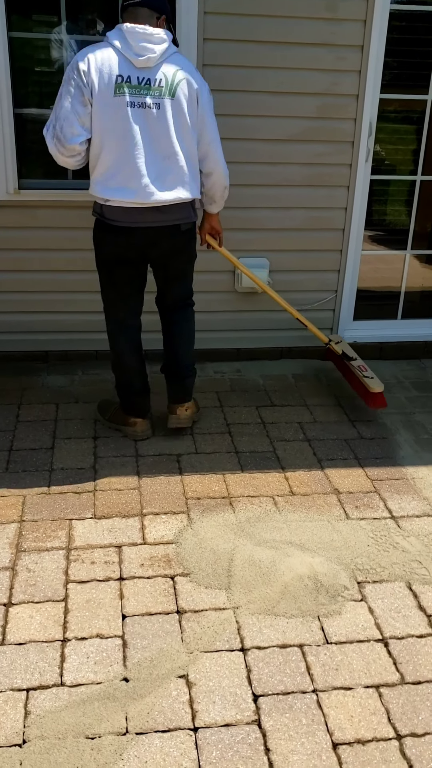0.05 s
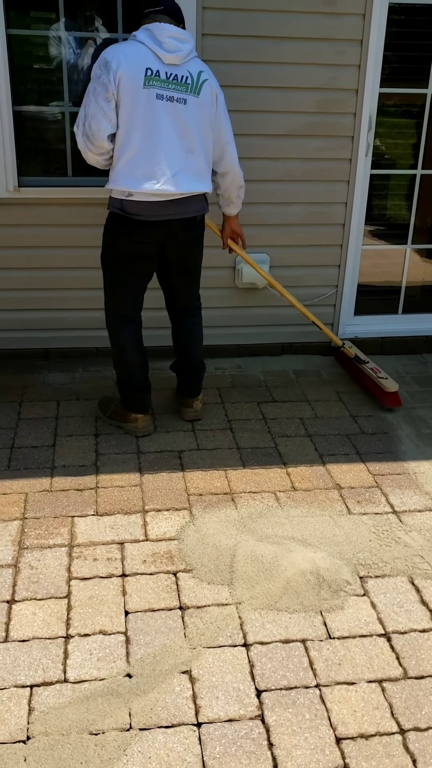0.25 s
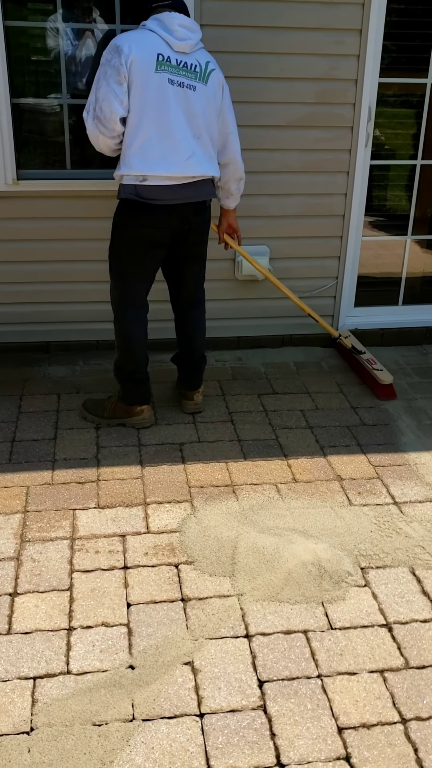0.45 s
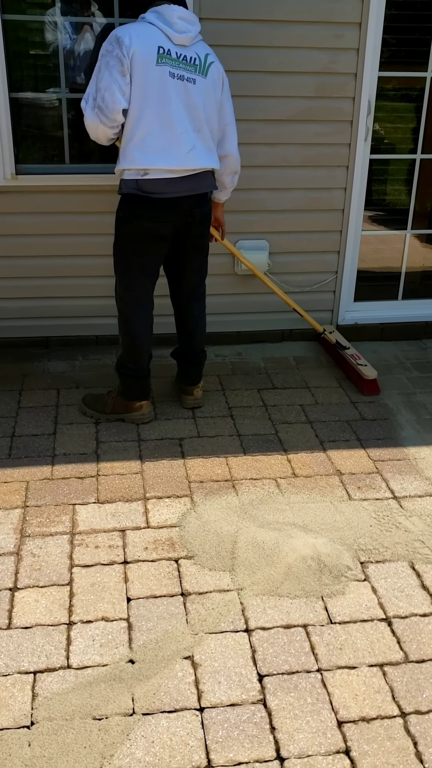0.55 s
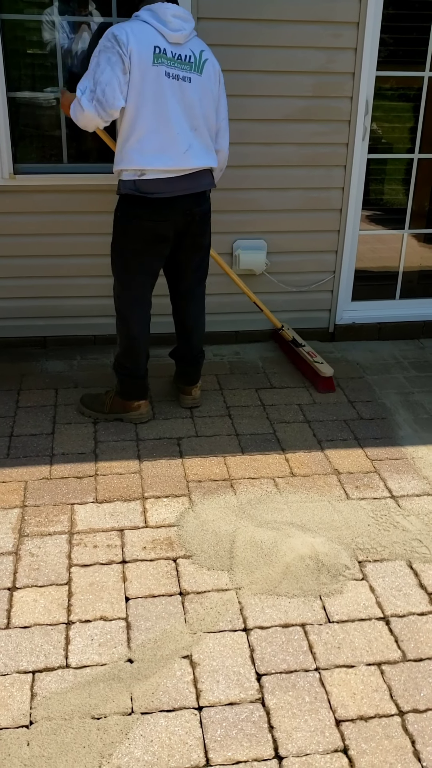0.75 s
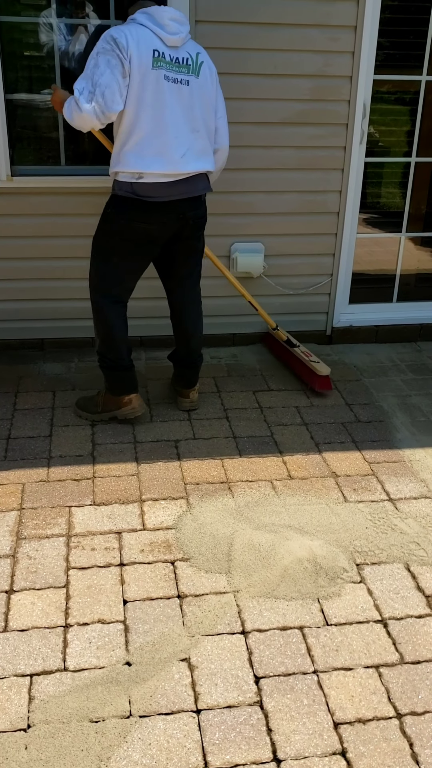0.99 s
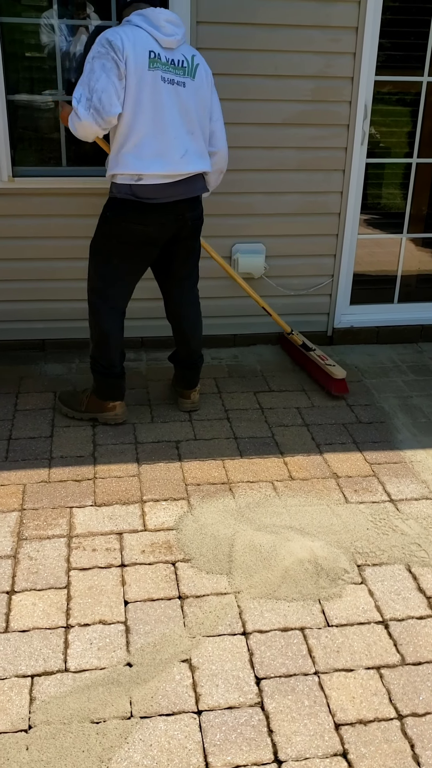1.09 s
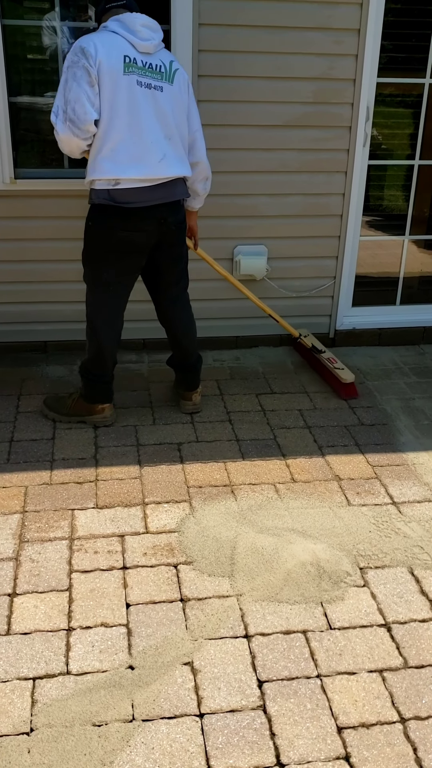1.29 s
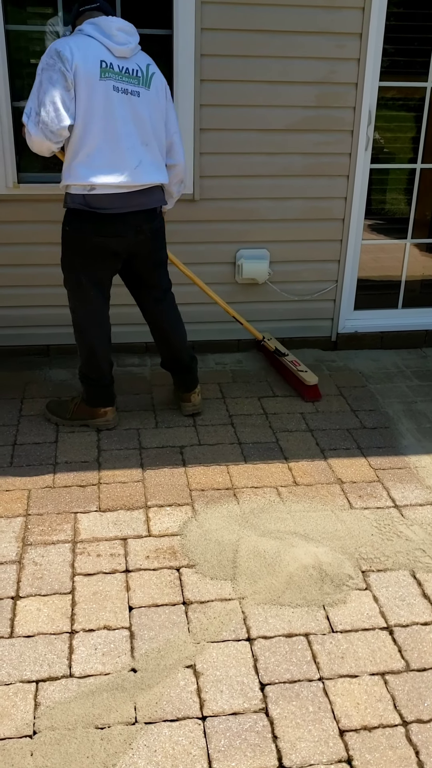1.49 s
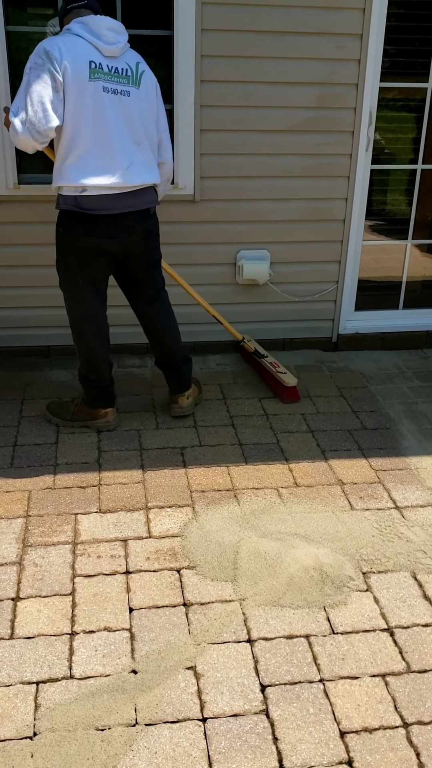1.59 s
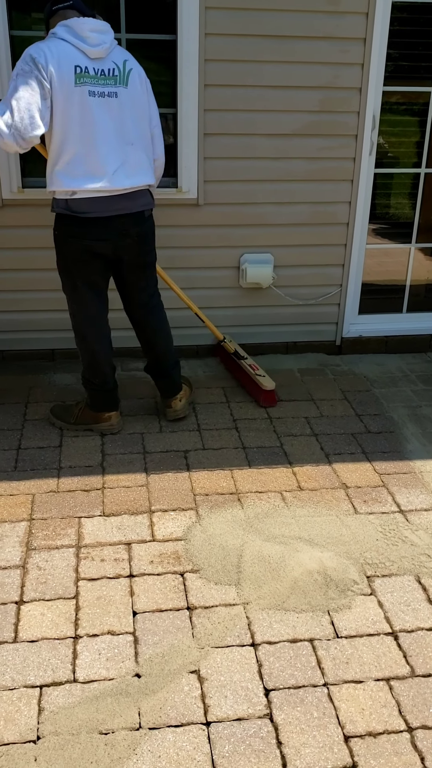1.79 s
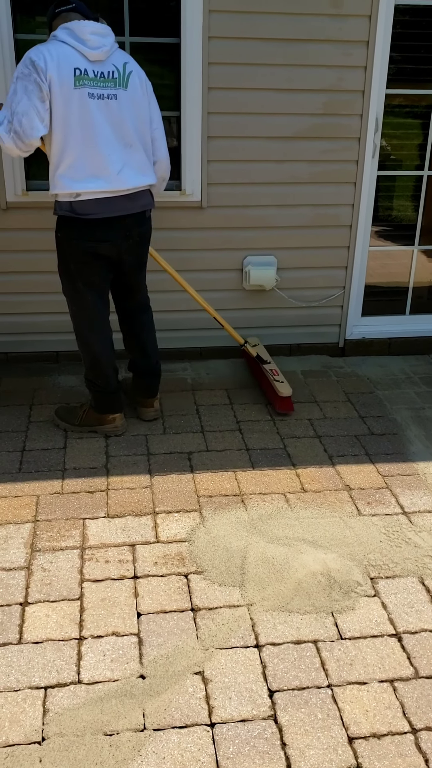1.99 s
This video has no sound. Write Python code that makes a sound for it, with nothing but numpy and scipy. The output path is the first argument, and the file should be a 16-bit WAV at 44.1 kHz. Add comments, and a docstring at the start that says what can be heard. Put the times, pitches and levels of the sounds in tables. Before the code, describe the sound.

Broom sweeping on a sandy patio beside a house wall, heard close in stereo. Shoes crunch, the broom head knocks once and swishes, pauses with a step, then swishes again over faint birds, rumble and hum.

```python
"""A paver patio beside a house, where a stiff push broom makes two strokes through sand.
Grain clicks over noise make the bristle rasp, sand hiss and shoe scuffs; two heel stamps are short sine thumps.
The wooden broom head knocks once, a sum of decaying modes, and the wall throws it back.
A small bird trills far off in falling sine notes, a second whistles, and shaped noise makes the
outdoor rumble, air and fading roar, with a faint machine hum of wavering sines."""
import sys
import numpy as np
from scipy import signal
from scipy.fft import rfft, irfft
from scipy.io import wavfile

SR = 44100
rng = np.random.default_rng(int(sys.argv[2]) if len(sys.argv) > 2 else 0)


def materialize(psi):
    """Save the field psi as 16-bit PCM at rate SR to the path in sys.argv[1].

    A 1-D psi becomes a single channel; in a 2-D psi each row is a channel.
    """
    bounded = np.clip(np.atleast_2d(psi).T, -1, 1)
    quanta = np.round(bounded * 32767).astype(np.int16)
    wavfile.write(sys.argv[1], SR, quanta)


N = 90404
T, HZ = np.arange(N) / SR, np.fft.rfftfreq(N, 1 / SR)

# Noise colours. Each row: frequency in Hz, relative level per Hz in dB.
RUMBLE_COLOUR = [(26, -32), (40, -9), (60, -0.5), (80, 3.5), (110, -9), (170, -16.5), (400, -54),
                 (2000, -90)]
# Colour of the open air. Each row: frequency in Hz, relative level per Hz in dB.
AIR_COLOUR = [(25, -21), (60, 0), (150, 0), (250, -4), (380, -3.5), (550, -9), (900, -7.5), (1400, -12),
              (2200, -18), (3000, -23), (3600, -32.5), (7000, -24.5), (8200, -31.5), (10000, -87),
              (12000, -43), (15000, -44)]
# Colour of the far-off roar. Each row: frequency in Hz, relative level per Hz in dB.
ROAR_COLOUR = [(400, 0), (650, 2.5), (850, 13), (1050, 2.5), (1400, -7), (3000, -68)]
RUMBLE_DB, AIR_DB, ROAR_DB = -52, -57.5, -57.5  # the roar's level is at the start
ROAR_FADE_DB_PER_S = 7
# Partials of the machine hum. Each row: frequency in Hz, rms level in dB.
HUM_PARTIALS = [(59.5, -59.5), (161.5, -67.5), (323.5, -63)]

# The broom's travel. Each row: time in seconds, bristle rasp level in dB, sand hiss level in dB.
BROOM_TRAVEL = [(0, -57, -75), (.12, -67.5, -81), (.38, -71, -82), (.42, -75, -57), (0.476, -50.5, -65),
                (.50, -65.5, -73), (0.559, -51.5, -65), (0.661, -47.5, -50.5), (0.779, -44.5, -49),
                (.855, -44, -49), (.91, -50, -56.5), (0.958, -54, -66.5), (1.02, -67, -76),
                (1.2, -69, -104), (1.26, -56, -81), (1.31, -57, -61.5), (1.39, -57.5, -67.5),
                (1.44, -50, -57.5), (1.502, -42, -55), (1.57, -43.5, -50), (1.70, -46.5, -48),
                (1.77, -45, -51.5), (1.84, -53, -63), (1.89, -58, -69), (1.94, -70.5, -75.5),
                (2.04, -74, -84)]
# Colour of bristles on pavers. Each row: frequency in Hz, relative level per Hz in dB.
RASP_COLOUR = [(100, -43), (350, -19.5), (600, -17.5), (850, -12.5), (1150, -10.5), (1500, -2),
               (2050, -5.5), (2350, 1), (2900, -5), (3200, -5.5), (3700, -13.5), (5000, -16), (7400, -15.5),
               (8500, -34)]
# Colour of driven sand. Each row: frequency in Hz, relative level per Hz in dB.
HISS_COLOUR = [(1500, -7.5), (3500, 0.5), (4600, 1.5), (7400, 1), (8500, -0.5), (10200, -3.5), (11300, 3.5),
               (12400, 4.5), (13600, 0.5), (15000, -8)]
# Colour of the light drag. Each row: frequency in Hz, relative level per Hz in dB.
DRAG_COLOUR = [(200, -12), (900, -3), (1600, 2.5), (2600, 2.5), (3200, -1.5), (3550, 3), (4200, -6),
               (5500, -5), (6400, -8), (7400, 1.5), (8300, -39)]
DRAG_DB = -55  # before it is leaned to the right
DRAG_FROM_S, DRAG_TO_S, DRAG_FADE_S = 0.96, 1.388, 0.08
TICK_S, TICK_DB = 1.0495, -56  # one grain snaps off a bristle
# Bristles and block ringing under the stroke. Each row: frequency in Hz, width in Hz, boost in dB.
BLOCK_RESONANCES = [(1696, 40, 2.5), (1820, 34, 3), (2010, 57, 1.5), (2273, 24, 4), (2400, 23, 3.5),
                    (2717, 97, 4.5), (2920, 57, 6), (3300, 43, -2)]
# Broom echoes off paving and wall. Each row: delay in seconds, level in dB.
BROOM_ECHOES = [(.0043, -18.5), (0.011, -13.5), (0.0174, -15)]

# The broom at the two microphone ports. Each row: frequency in Hz, likeness of the ports from 0 to 1,
# left lead in radians, left over right in dB.
BROOM_PORTS = [(198, 0.3, 3.7, -10), (620, 0.8, 2.2, 4), (840, 0.5, 0, 13), (1230, 0.74, 0.07, -2),
               (1900, 0.92, 1.1, 4), (2430, 0.4, 0, 11), (3280, 0.55, 1.56, 6), (4350, 0.2, -7, 10),
               (6400, 0, 1.5, 7), (7740, 0, -13, 5), (8500, 0.6, -5, -5.5), (11000, 0.2, -4, 8),
               (12400, 0.3, -3.5, 5.5), (15200, 0.5, -7, 12)]
# Shoes, drag and outdoors at the ports. Each row: frequency in Hz, likeness from 0 to 1,
# left lead in radians, left over right in dB.
NEAR_PORTS = [(101, 0.97, 0, 0.5), (394, 0.88, 0.16, -1), (1200, 0.49, 0.003, 2.5),
              (2460, 0.41, 0.086, 4.5), (5050, 0.12, 0, 13.5), (14300, 0.2, 0.05, 4.5)]

# One falling chip of the trill. Each row: time in seconds, pitch in Hz.
CHIP_GLIDE = [(0, 7360), (.005, 6700), (.011, 5640), (.016, 4800), (.026, 4080)]
# The short note after each chip. Each row: time in seconds, pitch in Hz.
FLICK_GLIDE = [(0, 7100), (.004, 6850), (.008, 6360), (.015, 5400)]
TRILL_S, CHIP_GAP_S, CHIP_COUNT = .1375, .05412, 33
TRILL_DB, TRILL_SWELL_S = -55.5, 0.49  # level before panning
TRILL_LAG_S = .013  # the last chips come a little late as the trill runs out
FLICK_S, FLICK_DB = .0195, -2  # delay after the chip, level against it
# A second bird. Each row: start in seconds, length in seconds, pitch in Hz, peak level before panning in dB.
WHISTLES = [(-.01, 0.054, 5700, -59), (0.07, 0.047, 5980, -59.5), (0.241, 0.039, 5650, -59.5),
            (0.989, 0.063, 5980, -51), (0.994, 0.055, 6740, -54)]

# Shoes on sand. Each row: start in seconds, length before the fall in seconds, sole scrape in dB
# before its ring is added, coarse grit in dB, sand fizz in dB, heel thud in dB, ring of the sole in Hz.
SCUFFS = [(.171, 0.029, -48.5, -52, -72, -50, 1950), (0.207, .023, -46.5, -51.5, -63, -41, 2000),
          (0.234, 0.012, -47.5, -56.5, -61, -45.5, 1930), (.366, 0.017, -46.5, -64, -66, -64, 1630),
          (.402, 0.0092, -41, -55.5, -54.5, -48.5, 1774), (1.223, 0.0075, -43.5, -49.5, -74, -48.5, 1440),
          (1.238, 0.038, -52.5, -66.5, -70, -53.5, 1290)]
SCUFF_RISE_S, SCUFF_FALL_S = 0.0026, 0.0072
SOLE_Q, SOLE_RING = 7.8, 1.4  # sharpness, gain of the ring
# Colour of the scraping sole. Each row: frequency in Hz, relative level per Hz in dB.
SCRAPE_COLOUR = [(80, -16), (300, -14), (600, -3.5), (850, 3.5), (1800, 3.5), (2900, 7), (3200, -16),
                 (4200, -20), (9000, -40)]
# Colour of coarse grit. Each row: frequency in Hz, relative level per Hz in dB.
GRIT_COLOUR = [(1500, -24), (3000, 6.5), (3700, -1), (4400, -5), (7500, -12), (9000, -25.5)]
# Colour of fine sand underfoot. Each row: frequency in Hz, relative level per Hz in dB.
FIZZ_COLOUR = [(3000, -15), (7500, 1.5), (8800, -27), (11500, 0.5), (15000, -8)]
# Colour of the soft heel thud. Each row: frequency in Hz, relative level per Hz in dB.
THUD_COLOUR = [(40, -10), (130, -11), (230, 0.5), (380, -3), (700, -16), (3000, -70)]
# A coarse grain breaks under the sole. Each row: time in seconds, approximate peak level in dB.
CRACKS = [(0.2378, -29.5), (0.4062, -35), (1.2225, -35), (1.2278, -39)]
CRACK_HZ, CRACK_DECAY_S = 1700, 0.00025
# A heel takes the full weight. Each row: time in seconds, pitch in Hz, peak level in dB.
STAMPS = [(.217, 217, -33.5), (1.2338, 86, -37.5)]
STAMP_PEAK_S = .004

# Modes of the wooden head. Each row: frequency in Hz, relative level in dB, 60 dB decay in seconds,
# left over right in dB.
HEAD_MODES = [(387, 12, 0.014, 0), (448, -8, 0.029, -12), (380, -19.5, .1, -7.5), (862, -9.5, .024, 10),
              (1033, -0.5, 0.0091, 11), (1296, -5, 0.016, 0), (1464, -15.5, 0.026, 4),
              (1840, -18.5, 0.03, 5.5), (2380, -9.5, 0.0082, 8), (2820, -17, 0.012, 9.5)]
KNOCK_S, KNOCK_DB, KNOCK_RISE_CYCLES = .5128, -12.5, 1.9
BLOCK_NODE_HZ = 650  # modes of the head above this start in the opposite direction
HEAD_PORT_LAG_S = 0.00019  # the knock reaches the right port a little later
# The house wall's answers. Each row: delay in seconds, level in dB.
WALL_ECHOES = [(.0104, -25), (0.0159, -13.5), (.0258, -13)]

# Treble notch of the left port, then the right. Each row: centre in Hz, width in Hz.
PORT_NOTCHES = [(8440, 410), (7870, 1420)]
EDGE_HZ = 14750  # top of the band


def amp(db):
    """Decibels to gain."""
    return 10 ** (np.asarray(db) / 20)


def unit(x):
    """Scales to rms 1."""
    return x / np.sqrt(np.mean(x ** 2) + 1e-20)


def read(table, axis=1):
    """One column of a frequency table at every bin, along a log frequency scale."""
    table = np.array(table)
    return np.interp(np.log(HZ + 1), np.log(table[:, 0]), table[:, axis])


def add(mix, s, sound):
    """Mixes a sound in at a time, trimmed to the scene."""
    at = round(s * SR)
    sound = sound[..., max(-at, 0):]
    part = mix[..., max(at, 0):][..., :sound.shape[-1]]
    part += sound[..., :part.shape[-1]]


def drift(rate_hz):
    """Random wander of rms 1, mostly slower than the rate."""
    return unit(irfft(rfft(rng.standard_normal(N)) / (1 + (HZ / rate_hz) ** 4), N))


def noise():
    """Two unrelated white noises."""
    return rng.standard_normal((2, N))


def grains(per_s, spread_db, wash):
    """Two unrelated trains of tiny clicks of uneven size over a smooth wash."""
    size = amp(spread_db * np.minimum(rng.exponential(1, (2, N)), 4))
    size = size * rng.choice([-1, 1], (2, N))
    struck = rng.random((2, N)) < per_s / SR
    return unit(size * struck) + wash * noise()


def heard(drive, colour, ports):
    """Colours a pair of drives and places them at the two ports; the middle has rms 1."""
    a, b = rfft(drive)
    same = np.clip(read(ports), 0, 1)
    side = amp(read(ports, axis=3) / 2)
    right = same * a + np.sqrt(1 - same ** 2) * b
    right = right * np.exp(-1j * read(ports, axis=2))
    x = irfft(np.array([a * side, right / side]) * amp(read(colour)), N)
    return x / x.mean(0).std()


def patio(x, t60):
    """A short diffuse tail from walls and paving: decaying noise with a soft onset."""
    t = T[:SR // 2]
    tail = rng.standard_normal((2, len(t))) * amp(-60 * t / t60) * np.minimum(t / 0.0092, 1)
    tail /= np.linalg.norm(tail[0])
    return signal.fftconvolve(np.atleast_2d(x), tail, axes=1)[:, :N]


def outdoors():
    """Uneven rumble, air and a fading far-off roar, with the wavering hum of a machine."""
    rumble = heard(noise(), RUMBLE_COLOUR, NEAR_PORTS) * amp(RUMBLE_DB + 2 * drift(rate_hz=10.4))
    air = heard(noise(), AIR_COLOUR, NEAR_PORTS) * amp(AIR_DB + 0.81 * drift(rate_hz=13))
    roar = heard(noise(), ROAR_COLOUR, NEAR_PORTS) * amp(ROAR_DB - ROAR_FADE_DB_PER_S * T)
    hum = np.zeros(N)
    for hz, db in HUM_PARTIALS:
        cycles = np.cumsum(hz * (1 + 0.0084 * drift(rate_hz=12.8))) / SR + rng.random()
        hum += amp(db) * np.sqrt(2) * np.sin(2 * np.pi * cycles)
    return rumble + air + roar + hum


def rung(x):
    """The broom block rings along and nearby surfaces return the sound; overall level is kept."""
    boost = amp(sum(db / (1 + (2 * (HZ - hz) / width) ** 2) for hz, width, db in BLOCK_RESONANCES))
    echoes = 1 + sum(amp(db) * np.exp(-2j * np.pi * HZ * delay) for delay, db in BROOM_ECHOES)
    y = irfft(rfft(x) * boost * echoes, N)
    return y * x.std() / y.std()


def broom():
    """Bristles flick over the pavers and drive sand ahead; between strokes they are drawn lightly back."""
    s, rasp_db, hiss_db = np.transpose(BROOM_TRAVEL)
    catch = drift(rate_hz=36)  # shared unevenness of the bristles, in dB
    rasp = heard(grains(per_s=2000, spread_db=2.5, wash=0.6), RASP_COLOUR, BROOM_PORTS)
    rasp *= amp(np.interp(T, s, rasp_db) + catch)
    hiss = heard(grains(per_s=4500, spread_db=-0.5, wash=0.66), HISS_COLOUR, BROOM_PORTS)
    hiss *= amp(np.interp(T, s, hiss_db) + 0.83 * catch)

    contact = np.clip(np.minimum(T - DRAG_FROM_S, DRAG_TO_S - T) / DRAG_FADE_S, 0, 1)
    drag = heard(grains(per_s=1800, spread_db=-1.5, wash=0.61), DRAG_COLOUR, NEAR_PORTS)
    drag *= contact * amp(DRAG_DB + 1.85 * catch)
    lean_right = amp([[-3.5], [3.5]])

    tick = heard(noise(), HISS_COLOUR, NEAR_PORTS)
    tick *= np.exp(-abs(T - TICK_S) / .0004) * amp(TICK_DB)
    return rung(rasp) + rung(hiss) + tick + rung(drag) * lean_right


def note(glide):
    """A whistled note that swells quickly and fades as it falls."""
    s, hz = np.transpose(glide)
    t = np.arange(0, s[-1], 1 / SR)
    swell = np.sin(np.pi * (t / s[-1]) ** 0.62) ** 2
    return np.sin(2 * np.pi * np.cumsum(np.interp(t, s, hz)) / SR) * swell


def birds():
    """A distant trill of falling chips that swells in, and a few thin whistles of unsteady pitch."""
    chip, flick = note(CHIP_GLIDE), note(FLICK_GLIDE)
    trill, calls = np.zeros(N), np.zeros(N)
    for k, size_db in enumerate(rng.normal(0, 0.17, CHIP_COUNT)):
        swell = min((k + 1) * CHIP_GAP_S / TRILL_SWELL_S, 1)
        s = TRILL_S + k * CHIP_GAP_S + TRILL_LAG_S * (k / CHIP_COUNT) ** 7
        add(trill, s, chip * swell * amp(TRILL_DB + size_db))
        add(trill, s + FLICK_S, flick * swell * amp(TRILL_DB + size_db + FLICK_DB))
    for start, length, pitch_hz, db in WHISTLES:
        arch = np.sin(np.pi * np.clip((T - start) / length, 0, 1))
        cycles = np.cumsum(pitch_hz * (1 + 0.0126 * drift(rate_hz=380))) / SR
        calls += amp(db) * arch * np.sin(2 * np.pi * cycles)
    direct = (trill + calls) * amp([[3], [-7]])  # left, right
    return direct + amp([[-1], [-8]]) * patio(trill, t60=0.16)


def shoes():
    """Each sole scrapes with its own ring, crunches the sand and thuds softly as it takes weight."""
    scrape = heard(grains(per_s=3200, spread_db=0.0, wash=0.54), SCRAPE_COLOUR, NEAR_PORTS)
    grit = heard(grains(per_s=1500, spread_db=1.0, wash=0.43), GRIT_COLOUR, NEAR_PORTS)
    fizz = heard(grains(per_s=2500, spread_db=1.0, wash=0.3), FIZZ_COLOUR, NEAR_PORTS)
    thud = heard(noise(), THUD_COLOUR, NEAR_PORTS)
    x, t = np.zeros((2, N)), T[:SR // 10]
    for s, length, scrape_db, grit_db, fizz_db, thud_db, sole_hz in SCUFFS:
        rise = np.clip((T - s) / SCUFF_RISE_S, 0, 1)
        press = rise * np.exp(-np.maximum(T - s - length, 0) / SCUFF_FALL_S)
        sole = scrape + SOLE_RING * signal.lfilter(*signal.iirpeak(sole_hz, SOLE_Q, fs=SR), scrape)
        sand = amp(grit_db) * grit + amp(fizz_db) * fizz
        x += press * (amp(scrape_db) * sole + sand + amp(thud_db) * thud)
    for s, db in CRACKS:
        # the doubling makes up for the fast decay
        add(x, s, 2 * amp(db) * np.sin(2 * np.pi * CRACK_HZ * t) * np.exp(-t / CRACK_DECAY_S))
    for s, hz, db in STAMPS:
        weight = t / STAMP_PEAK_S * np.exp(1 - t / STAMP_PEAK_S)
        add(x, s, amp(db) * np.sin(2 * np.pi * hz * t) * weight)
    return x + amp(-10.5) * patio(x, t60=0.2)


def knock():
    """The broom head lands, its wooden modes ring and die, and the house wall answers duller."""
    t = np.maximum(T[:SR // 4] - np.array([[0], [HEAD_PORT_LAG_S]]), 0)
    ring, x = np.zeros(t.shape), np.zeros((2, N))
    for hz, db, t60, pan_db in HEAD_MODES:
        direction = np.sign(hz - BLOCK_NODE_HZ)
        decay = amp(db - 60 * t / t60 + np.array([[.5], [-.5]]) * pan_db)
        rise = np.minimum(t * hz / KNOCK_RISE_CYCLES, 1)
        ring += amp(KNOCK_DB) * direction * decay * rise * np.sin(2 * np.pi * hz * t)
    add(x, KNOCK_S, ring)
    dull = signal.sosfilt(signal.butter(1, 900, fs=SR, output="sos"), ring)
    for delay, db in WALL_ECHOES:
        add(x, KNOCK_S + delay, amp(db) * dull)
    return x + amp(-11) * patio(x, t60=0.16)


def scene():
    """Everything on the patio."""
    return outdoors() + broom() + birds() + shoes() + knock()


def record(dry):
    """Each microphone port has a notch in the treble; then a steep low-pass limits the band."""
    notch = np.array([1 - .95 * np.exp(-((HZ - hz) / width) ** 2) for hz, width in PORT_NOTCHES])
    x = irfft(rfft(dry) * notch, N)
    low_pass = signal.firwin(511, EDGE_HZ, window=("kaiser", 8), fs=SR)
    return signal.oaconvolve(x, low_pass[None], "same")


dry = scene()
out = record(dry)
materialize(out)
```